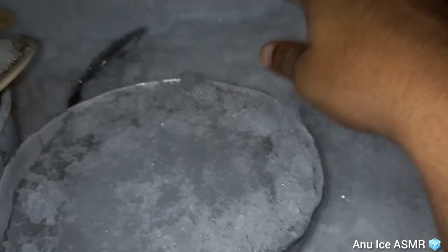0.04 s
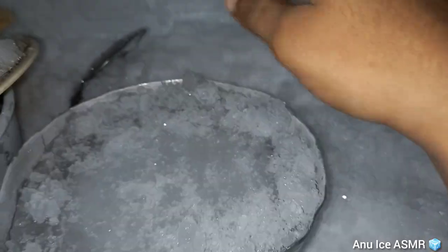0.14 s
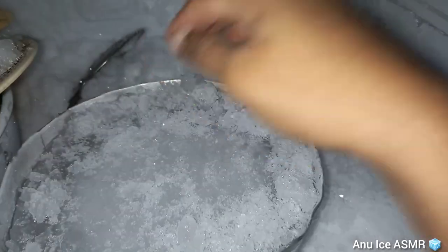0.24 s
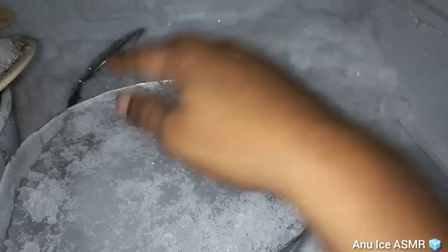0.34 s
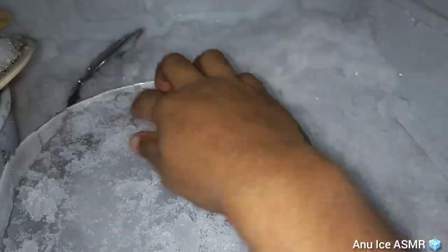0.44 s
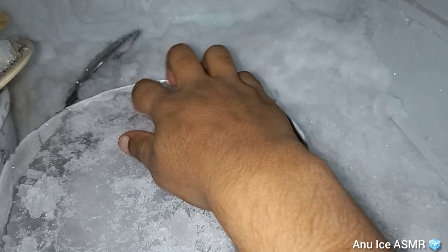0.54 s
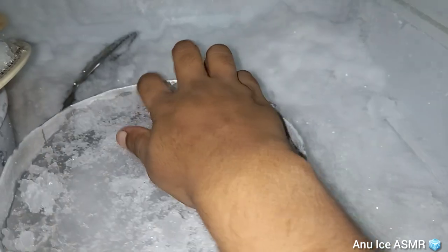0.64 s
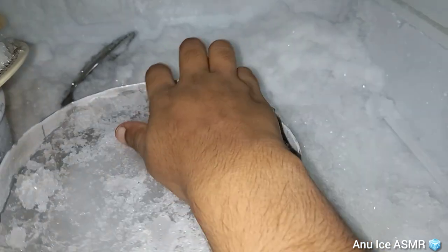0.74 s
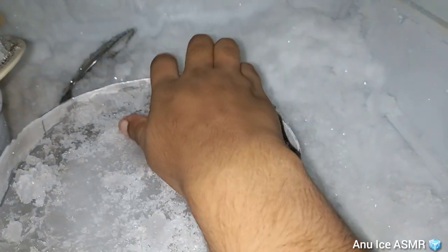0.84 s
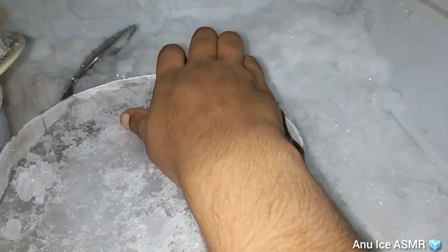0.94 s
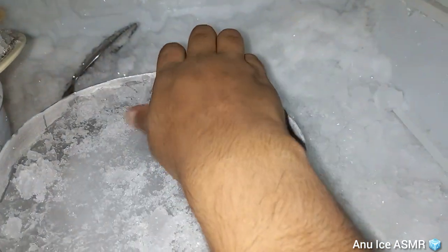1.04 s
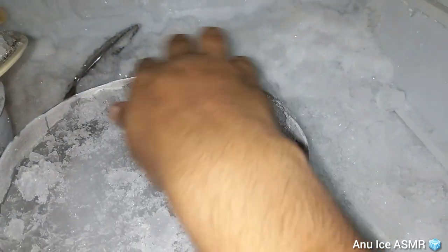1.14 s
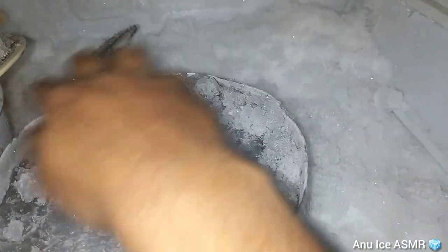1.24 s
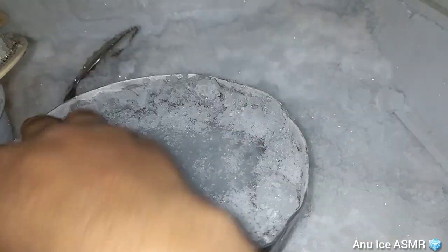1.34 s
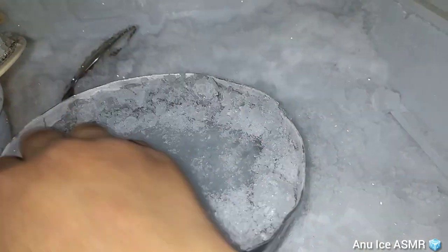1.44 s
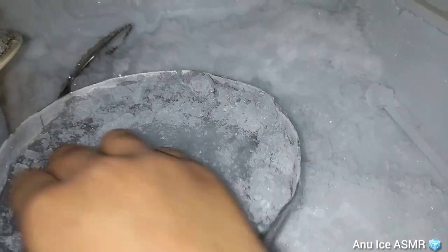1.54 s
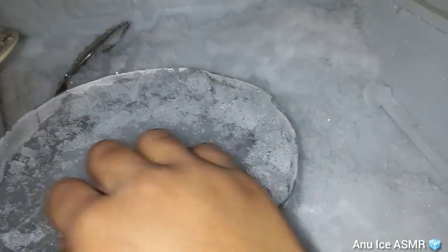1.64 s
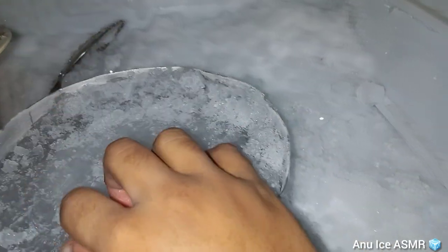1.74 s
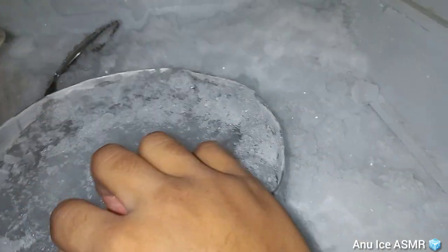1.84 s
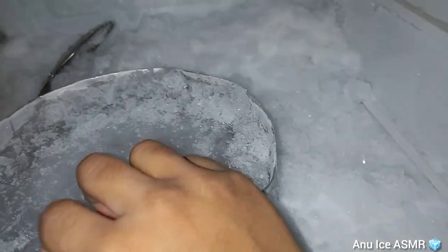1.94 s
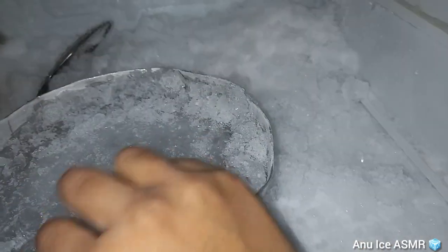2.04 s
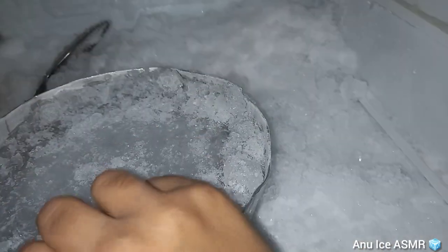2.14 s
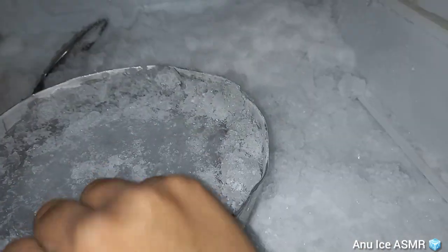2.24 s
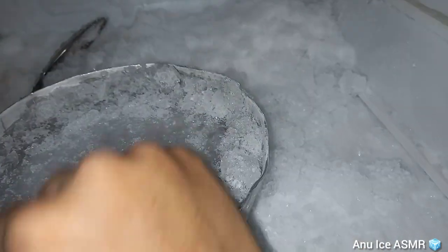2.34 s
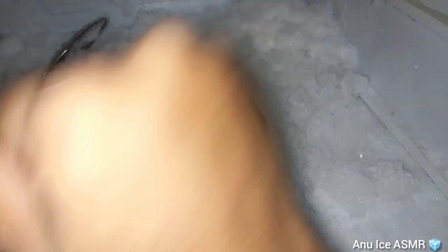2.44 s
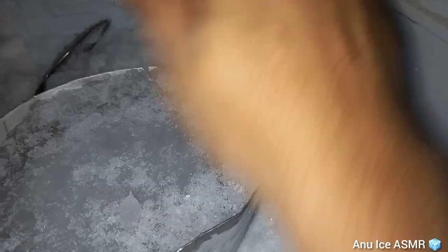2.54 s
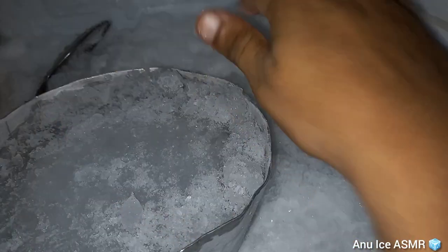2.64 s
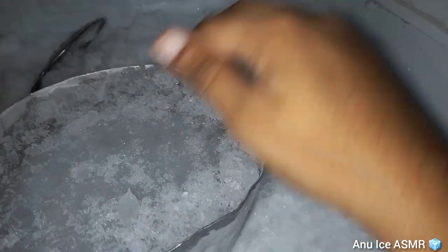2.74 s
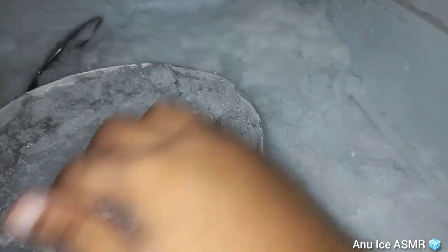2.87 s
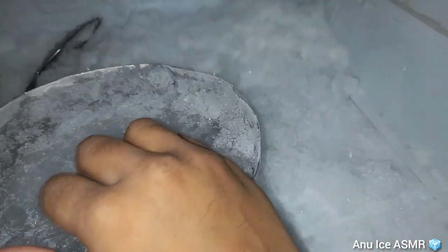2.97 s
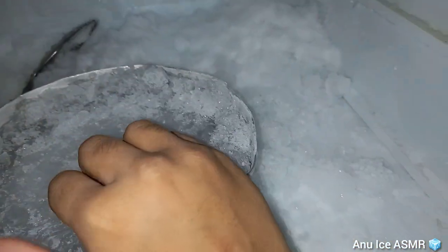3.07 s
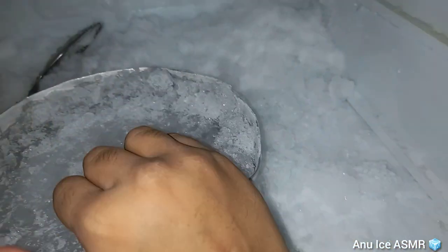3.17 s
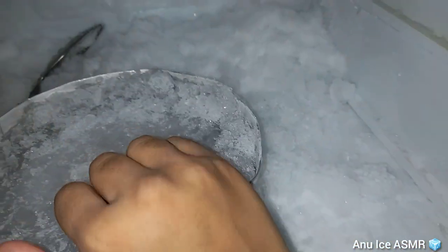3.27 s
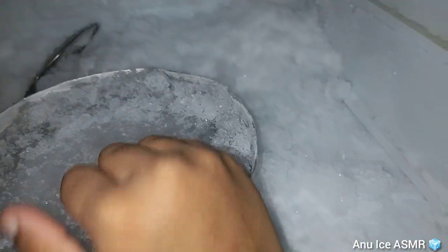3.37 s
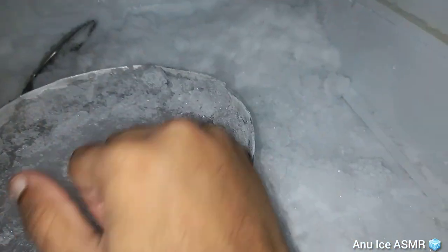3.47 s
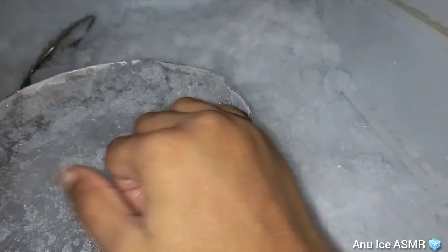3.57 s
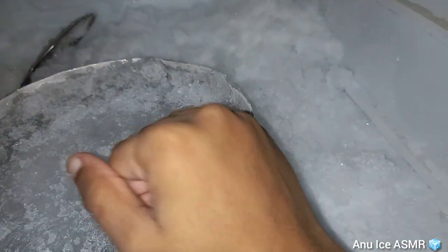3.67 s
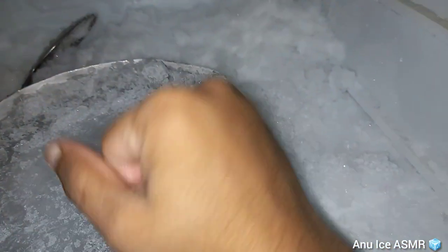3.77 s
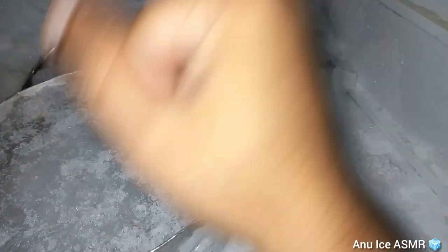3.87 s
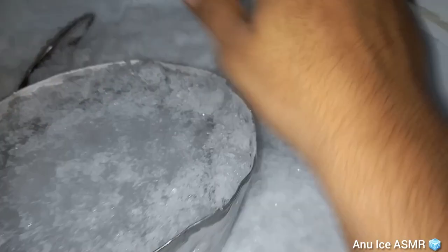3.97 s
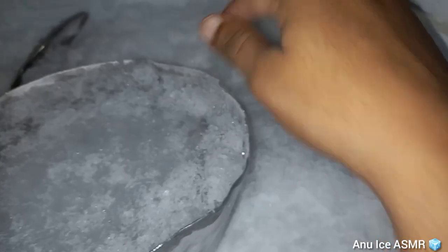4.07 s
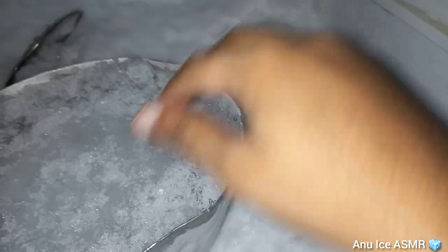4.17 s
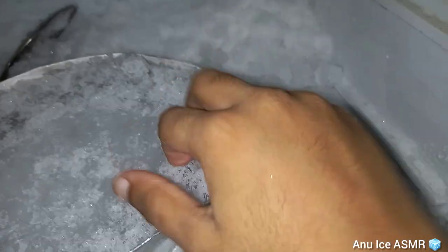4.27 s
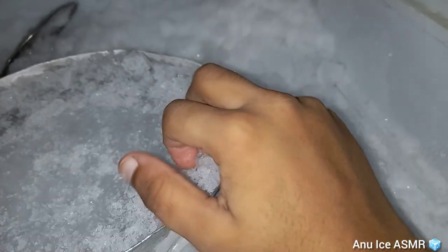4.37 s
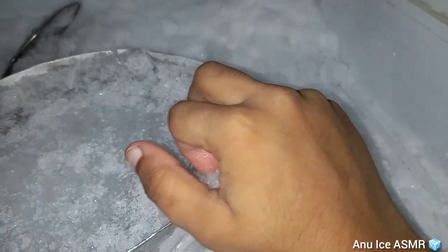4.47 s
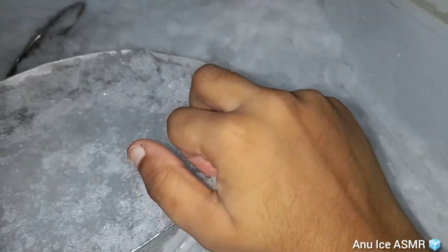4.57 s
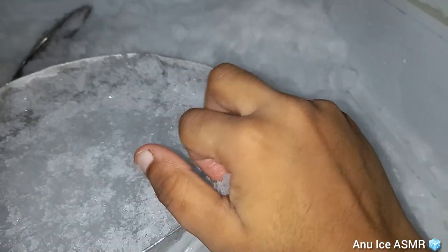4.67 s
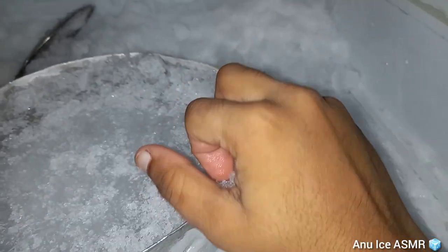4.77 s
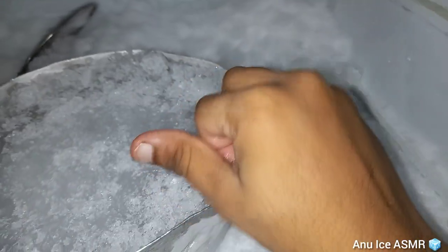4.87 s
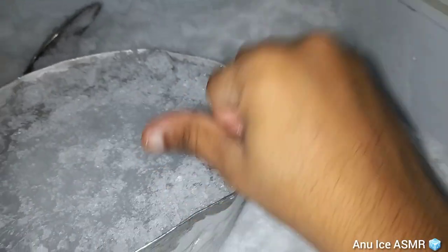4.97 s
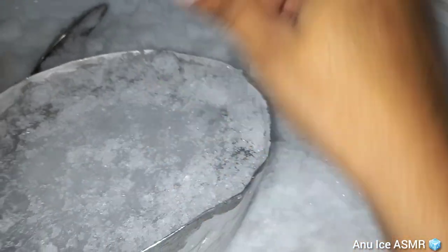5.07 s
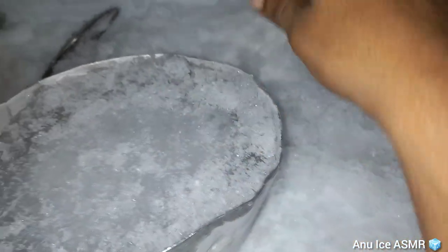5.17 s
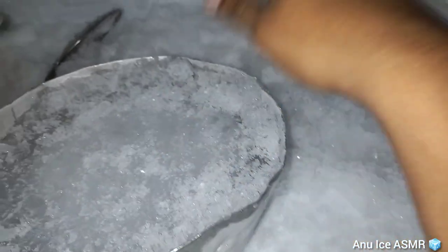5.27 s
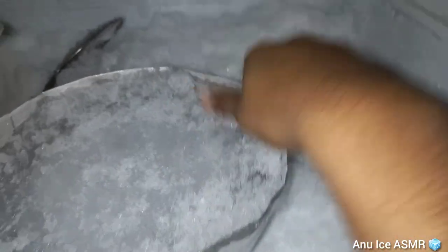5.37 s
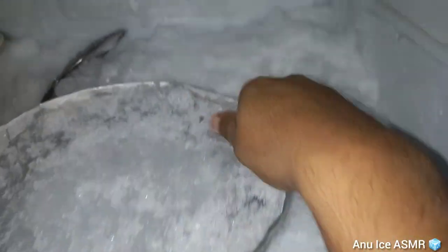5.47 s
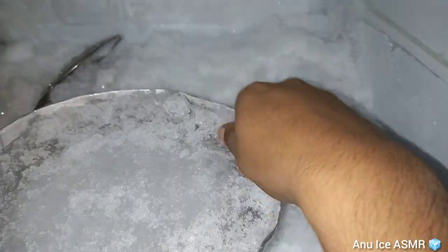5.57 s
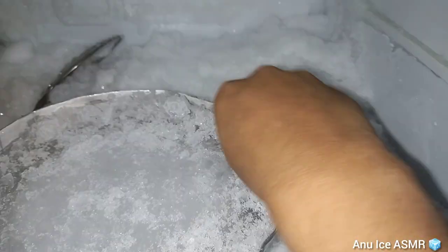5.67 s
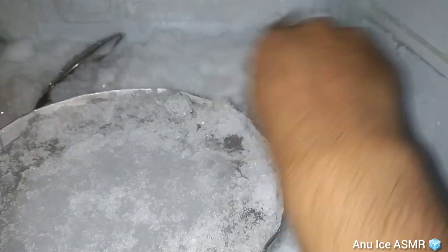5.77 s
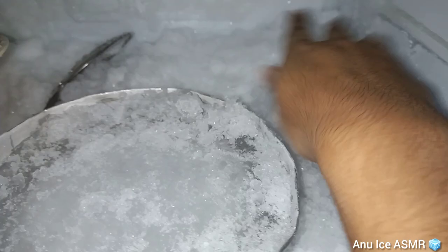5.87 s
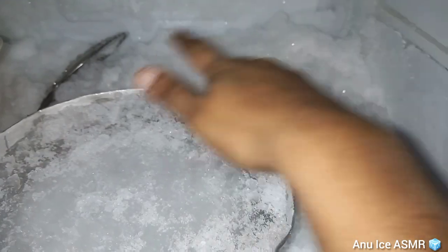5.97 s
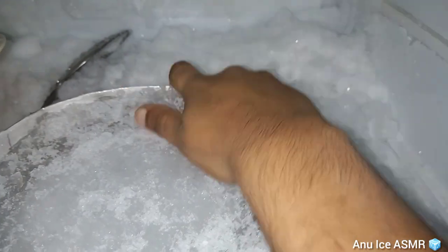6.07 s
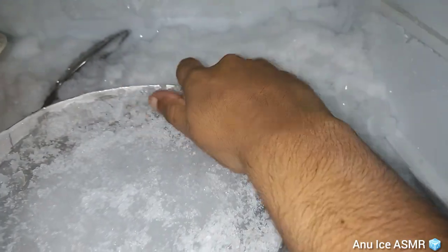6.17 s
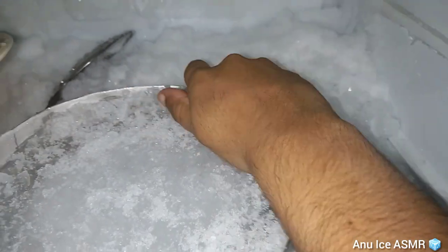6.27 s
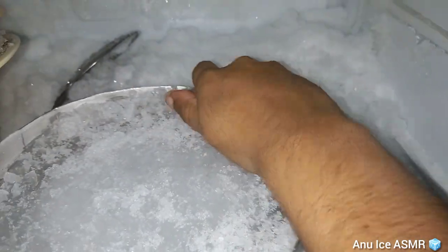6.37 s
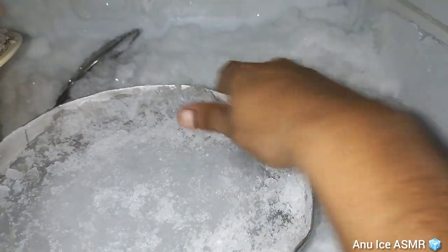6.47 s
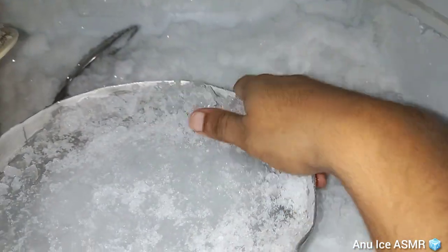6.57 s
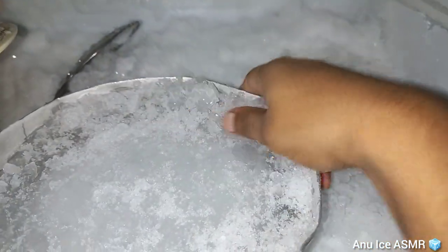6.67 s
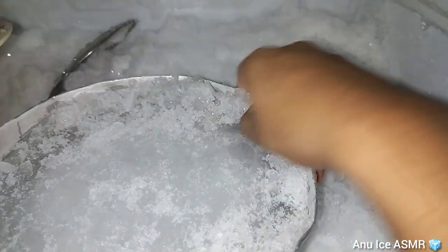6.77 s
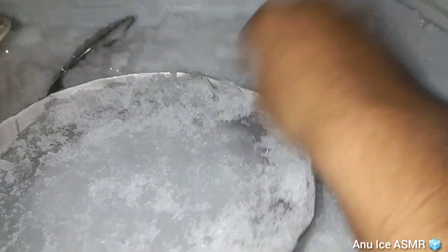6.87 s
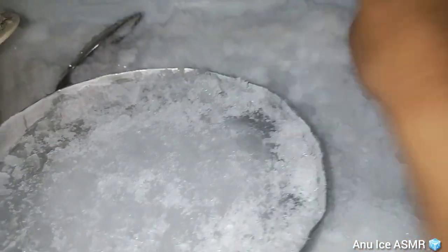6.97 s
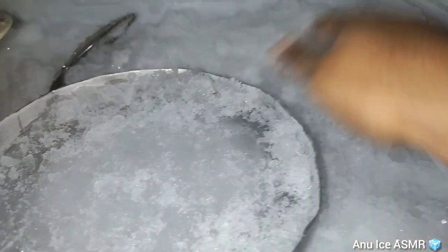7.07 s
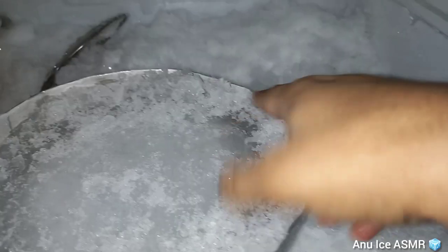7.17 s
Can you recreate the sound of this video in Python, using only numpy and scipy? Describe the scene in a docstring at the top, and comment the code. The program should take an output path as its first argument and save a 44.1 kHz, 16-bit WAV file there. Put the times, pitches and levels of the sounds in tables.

```python
"""A short scrape, a sharp snap of ice and a low boom: frost is pushed around inside a freezer, close up.
The edge sticks and slips over tiny crystals, which hiss, rasp and tick; on hard ice it squeals.
Crusts snap off, packed frost crunches, and shoves make the hollow freezer box boom and shudder.
The compressor hums and rumbles underneath."""
import sys
import numpy as np
from scipy import signal
from scipy.fft import rfft, irfft, next_fast_len
from scipy.io import wavfile
from scipy.ndimage import uniform_filter1d, map_coordinates

SR = 44100
rng = np.random.default_rng(int(sys.argv[2]) if len(sys.argv) > 2 else 0)


def log_audio(samples):
    """Write samples as a 16-bit WAV file to the path given in sys.argv[1]."""
    # one column per channel
    frames = np.atleast_2d(samples).T
    # limit to full scale, then quantise
    limited = np.clip(frames, -1, 1)
    pcm = np.round(limited * 32767).astype(np.int16)
    wavfile.write(sys.argv[1], SR, pcm)


N = 318402

# strokes through frost: (start [s], length [s], hiss [dB], rasp [dB], rasp centre [Hz], swell [dB])
FROST_STROKES = [(0.01, 0.088, -69, -44.5, 3100, 11), (0.101, 0.023, -34.5, -35.5, 5300, -11),
                 (0.116, 0.12, -71, -47, 3200, -7), (0.41, 0.19, -49.5, -58, 3600, -21),
                 (0.551, 0.25, -41, -32, 2800, -5.5), (0.82, 0.11, -52, -57, 3100, -5),
                 (1.062, 0.099, -50, -53, 4500, 14), (1.357, 0.34, -46.5, -49, 3000, 4),
                 (1.719, 0.22, -44, -42.5, 3100, 7.5), (2.0, 0.24, -35.5, -39, 4400, 3.5),
                 (2.238, 0.15, -47.5, -50, 3700, -11.5), (2.687, 0.12, -51.5, -61, 3200, -13),
                 (2.925, 0.099, -49.5, -50.5, 2700, -11), (2.999, 0.09, -45, -39.5, 2880, -7),
                 (3.113, 0.031, -39, -42.5, 3380, 1), (3.326, 0.08, -40, -39, 3270, 8),
                 (3.443, 0.15, -45.5, -47.5, 3500, 2), (3.586, 0.19, -35.5, -38.5, 4350, 4),
                 (4.095, 0.11, -49, -50.5, 2900, -8), (4.233, 0.17, -43.5, -46.5, 4200, -0.5),
                 (4.447, 0.058, -40.5, -40, 4500, 1), (4.693, 0.079, -39.5, -42, 4700, 8),
                 (4.778, 0.094, -45, -47, 4100, 4), (5.283, 0.092, -49, -56.5, 2800, -18.5),
                 (5.407, 0.035, -34.5, -50, 5500, 5), (5.478, 0.024, -31, -43, 5400, 0),
                 (5.543, 0.093, -38.5, -46.5, 5000, 5), (5.66, 0.077, -33, -43, 5600, -7),
                 (5.9, 0.1, -52, -50.5, 3000, 4), (6.057, 0.15, -36, -39.5, 4400, 3),
                 (6.234, 0.32, -47, -47, 4100, -5), (6.387, 0.079, -39.5, -29.5, 2550, 10),
                 (6.482, 0.24, -40.5, -48, 3400, 4.5), (6.743, 0.051, -27.5, -31, 5400, 1.5),
                 (6.854, 0.04, -28, -36.5, 5300, -9), (6.888, 0.17, -54, -54.5, 5600, -2)]
# crusts breaking off: (time [s], level [dB], decay [s], low edge [Hz], ring [Hz])
CRUST_SNAPS = [(0.073, -20, 0.0062, 5300, 7500), (0.0788, -12.5, 0.006, 4900, 7430),
               (0.512, -36, 0.011, 6030, 14000), (0.556, -29.5, 0.0064, 2580, 7700),
               (0.6485, -24, 0.0049, 3500, 7600), (0.799, -22.5, 0.0096, 2860, 12400),
               (0.848, -31.5, 0.0089, 4300, 4570), (0.897, -32, 0.006, 4570, 6800),
               (0.974, -38, 0.0065, 3730, 8350), (1.728, -26.5, 0.01, 3800, 6700),
               (2.014, -33, 0.0032, 4330, 8310), (2.1676, -26, 0.0033, 3070, 7710),
               (2.22, -30, 0.008, 3600, 4500), (2.377, -29, 0.0081, 2400, 2830),
               (2.6837, -26.5, 0.0082, 7000, 13200), (3.114, -24, 0.0043, 2280, 8800),
               (3.237, -29, 0.0059, 1580, 8440), (4.1065, -34, 0.0044, 2090, 15000),
               (4.4537, -16, 0.0073, 3430, 8600), (4.5, -26, 0.0041, 3270, 4100),
               (4.6378, -13.5, 0.0052, 3600, 5260), (4.699, -28, 0.0086, 3720, 8050),
               (4.747, -30.5, 0.015, 3480, 8200), (4.832, -30.5, 0.012, 3150, 3670),
               (5.244, -28, 0.0047, 3740, 11200), (5.538, -30, 0.0065, 4200, 5700),
               (5.639, -29, 0.013, 4170, 4700), (5.679, -28, 0.01, 4930, 7700),
               (5.735, -28, 0.0036, 4900, 7670), (5.922, -30.5, 0.01, 6960, 9300),
               (6.358, -30.5, 0.0038, 4150, 8400), (6.641, -23.5, 0.005, 8300, 15600),
               (6.787, -24, 0.0048, 4400, 12200), (7.2119, -29, 0.004, 2630, 3000)]
# packed frost giving way: (time [s], level [dB], decay [s])
FROST_CRUNCHES = [(0.5871, -10.5, 0.0069), (0.603, -27, 0.012), (0.67, -25, 0.0086), (0.724, -22, 0.013),
                  (0.746, -29, 0.011), (0.807, -27, 0.0085), (1.785, -37.5, 0.028), (1.8308, -26, 0.0063),
                  (1.8596, -18.5, 0.0047), (1.89, -27.5, 0.006), (3.11, -29.5, 0.013), (6.0655, -31, 0.013),
                  (6.384, -33.5, 0.021), (6.415, -25, 0.02), (6.442, -23, 0.0067), (6.46, -22, 0.0041),
                  (6.743, -27, 0.0094), (6.858, -29, 0.007)]
# glides over hard ice: (centre [s], level [dB], pitch [Hz], bandwidth [Hz], half length [s])
ICE_SQUEALS = [(1.63, -49.5, 3680, 700, .13), (2.377, -32.5, 3000, 600, .016), (3.696, -40, 3040, 750, .12),
               (4.263, -41, 4330, 550, 0.026), (4.846, -33.5, 4140, 1500, .03),
               (5.438, -36.5, 5700, 900, .018), (5.5, -30, 5500, 1200, 0.027),
               (5.551, -35, 5570, 900, 0.033), (5.59, -29, 5130, 900, 0.012),
               (5.698, -33, 7400, 900, 0.033), (6.789, -34, 5700, 1100, 0.018),
               (6.95, -50.5, 5820, 400, .06)]
# shoves on the box: (centre [s], level [dB], pitch [Hz], nominal length [s])
BOX_SHOVES = [(0.101, -29, 124, 0.027), (0.43, -33, 134, 0.022), (0.618, -13.5, 130.3, 0.038),
              (0.757, -22, 137.2, 0.013), (0.842, -19, 126, 0.053), (1.376, -23, 125.7, 0.024),
              (1.501, -18, 126.9, 0.018), (1.556, -17.5, 137.6, 0.021), (1.705, -20, 126.2, 0.02),
              (1.833, -20, 121.4, 0.027), (2.185, -15.5, 128.3, 0.035), (2.945, -14, 126, 0.022),
              (3.014, -17, 131.8, 0.019), (3.263, -24, 120, 0.024), (3.869, -20.5, 108.5, 0.016),
              (4.357, -18.5, 124, 0.03), (6.093, -17.5, 124.6, 0.02), (6.197, -23, 121, 0.034),
              (6.46, -15.5, 133.8, 0.047), (6.776, -22, 121.6, 0.022)]
# long pushes: (start [s], length [s], level [dB], pitch [Hz])
BOX_DRAGS = [(0.63, 0.38, -33.5, 126.3), (1.412, 0.57, -30, 128), (2.013, 0.27, -26.5, 122.4),
             (2.294, 0.18, -34, 128), (3.03, 0.039, -26, 129.5), (3.115, 0.058, -25.5, 133),
             (3.309, 0.1, -27, 115), (3.599, 0.072, -32, 114), (3.749, 0.093, -27, 118),
             (3.858, 0.13, -26, 101.8), (4.28, 0.12, -24, 117.8), (4.414, 0.15, -30.5, 116),
             (4.649, 0.18, -31, 116), (5.482, 0.23, -27.5, 127), (6.477, 0.47, -31, 130.2)]
# ice spectra: (frequency [Hz], level [dB])
HISS_SPECTRUM = [(2500, -15), (5000, -2.5), (6800, -4), (8300, 3), (10000, -4), (12500, -0.5),
                 (16000, -5.5)]
RASP_SPECTRUM = [(400, 8), (1200, 10), (2500, 7), (4500, 4), (6500, -4.5), (9000, 0.5), (16000, -10)]
TICK_SPECTRUM = [(1000, -36), (4000, -2), (9000, -14.5), (16000, -44)]
SNAP_SPECTRUM = [(500, 16.5), (2000, 4.5), (4500, -3), (8500, -1.5), (11000, -4.5), (16000, -5.5)]
CRUNCH_SPECTRUM = [(60, -40), (150, -16), (260, -1.5), (480, 10), (750, -10.5), (1350, -1), (1900, -3.5),
                   (3100, -7.5), (4500, -5), (8000, -16.5), (16000, -26.5)]
# tray and box resonances: (centre [Hz], bandwidth [Hz], gain [dB])
TRAY_MODES = [(895, 96, 13.5), (1261, 59, 12), (1406, 42, 11), (1527, 74, 8.5), (2200, 81, 6.5),
              (2550, 190, 14.5)]
BOX_MODES = [(97.6, 14.8, 3), (136.5, 24.8, 3), (183.4, 49, -7.5), (251.5, 24, -6.5), (313.6, 63.5, -12),
             (396, 64, -15.5), (477, 38, -11.5)]
# compressor lines and noise spectra: (frequency [Hz], level [dB])
HUM_LINES = [(47, -60), (124, -44), (256, -58), (466, -61)]
RUMBLE_SPECTRUM = [(25, -52), (45, -12), (69, -19.5), (83, -9), (108, -0.5), (143, -28), (190, -35),
                   (245, -18.5), (440, -11), (556, -15.5), (659, -24.5), (1000, -19), (1400, -71)]
AIR_SPECTRUM = [(350, -53.5), (600, -21.5), (634, -0.5), (779, -6.5), (1050, -8), (1390, -6.5), (1850, -11),
                (2010, -12), (2870, -17.5), (4400, -35.5), (8270, -23), (16000, -44)]
# left-right likeness of diffuse noise: (frequency [Hz], coherence [0..1])
STEREO_COHERENCE = [(30, 0.63), (70, 0.93), (160, 1), (300, 0.66), (600, 0.4), (2000, 0.1), (8000, 0.25)]
# balance of the ice: (frequency [Hz], right over left [dB])
ICE_BALANCE = [(1000, -0.5), (4000, 3.5), (6000, 0), (8500, 7.5), (12000, 4), (16000, -1.5)]

TOP_HZ, REST_RASP_HZ = 15900, 2450


def scraping(hiss_gain, rasp_gain, centre_hz, hiss_db=-1, rasp_db=-3.5, focus_db=6, focus_oct=0.099):
    """The edge grinds over crystals: fine hiss plus a coarse rasp that thins as its pitch climbs."""
    fractures = np.array([grains(N, spread_db=-0.5), grains(N, spread_db=6)])
    hz, t, (fine, coarse) = signal.stft(fractures, SR, nperseg=256)
    hz = hz[:, None]
    pitch_hz = np.interp(t, np.arange(N) / SR, centre_hz)
    bump_db = focus_db * np.exp(-(np.log2((hz + 1) / pitch_hz) / focus_oct) ** 2)
    cutoff_hz = 450 * (pitch_hz / REST_RASP_HZ) ** 2.7
    highpass_db = -10 * np.log10(1 + (cutoff_hz / (hz + 1)) ** 2)
    # each patch of frost has its own colour
    patches = uniform_filter1d(rng.standard_normal(fine.shape[-2:]), size=3, axis=0)
    patch_db = 2.5 * unit(uniform_filter1d(patches, size=14, axis=1))

    def coloured(cells, colour_db):
        colour = amp(colour_db + patch_db)
        _, sound = signal.istft(cells * colour / np.linalg.norm(colour, axis=0), SR, nperseg=256)
        return unit(sound[:, :N])

    hiss = coloured(fine, along(HISS_SPECTRUM, hz))
    rasp = coloured(coarse, along(RASP_SPECTRUM, hz) + bump_db + highpass_db)
    return stick_slip() * (hiss_gain * amp(hiss_db) * hiss + rasp_gain * amp(rasp_db) * rasp)


def strokes(attack_s=0.024, release_s=0.015, trickle_db=-23.5, trickle_s=0.04):
    """The edge bites, then lets go; loose crystals trickle on. Returns hiss gain, rasp gain, rasp Hz."""
    t = np.arange(N) / SR
    hiss_power, rasp_power = np.full(N, amp(-61) ** 2), np.full(N, amp(-58) ** 2)  # rustle at rest
    weighted_hz = rasp_power * REST_RASP_HZ
    for start_s, length_s, hiss_db, rasp_db, hz, swell_db in FROST_STROKES:
        span = slice(max(int((start_s - attack_s) * SR), 0), int((start_s + length_s + 0.5) * SR))
        age_s = t[span] - start_s
        after_s = np.maximum(age_s - length_s, 0)
        bite = np.clip(age_s / attack_s + 0.5, 0, 1)
        swell = amp(swell_db * (np.clip(age_s / length_s, 0, 1) - 0.5))
        release = np.maximum(np.exp(-after_s / release_s), amp(trickle_db) * np.exp(-after_s / trickle_s))
        power = (bite * swell * release) ** 2
        hiss_power[span] += amp(hiss_db) ** 2 * power
        rasp_power[span] += amp(rasp_db) ** 2 * power
        weighted_hz[span] += amp(rasp_db) ** 2 * power * hz
    resistance = amp(2.5 * wobble(rate_hz=28))
    return resistance * np.sqrt(hiss_power), resistance * np.sqrt(rasp_power), weighted_hz / rasp_power


def stick_slip(rate_hz=200, spread_db=5, decay_s=0.0078, glide=0.45):
    """Gain of an edge that gives way in sudden, decaying jerks over a steady glide."""
    slips = rng.random(N) < rate_hz / SR
    jerks = slips * amp(spread_db * np.clip(rng.standard_normal(N), -2, 1.5))
    power = signal.lfilter([1], [1, -np.exp(-2 / (decay_s * SR))], jerks ** 2)
    return unit(np.sqrt(power / np.mean(power) + glide ** 2))


def snaps(level_db=5, ring_db=12, overtone_db=8, width_hz=330, body_db=-26):
    """Each crust cracks above a pitch set by its size, and rings briefly in its own modes."""
    track = np.zeros((2, N))
    for time_s, db, decay_s, low_hz, ring_hz in CRUST_SNAPS:
        overtones_hz = low_hz * (TOP_HZ / low_hz) ** rng.random((6, 1))

        def colour(hz):
            highpass = amp(body_db) + 1 / np.sqrt(1 + (low_hz / (hz + 1)) ** 12)
            overtones = peak(hz, overtones_hz, width_hz).max(axis=0)
            modes_db = np.maximum(ring_db * peak(hz, ring_hz, width_hz), overtone_db * overtones)
            return highpass * amp(along(SNAP_SPECTRUM, hz) + modes_db)

        crack = fracture(decay_s, colour, spread_db=-3.5, rise_s=decay_s / 4, crumb_db=-27, crumb_s=0.0098)
        add(track, time_s, amp(db + level_db) * crack)
    return track


def crunches(level_db=1):
    """Packed frost collapses with a duller crack that rings the tray."""
    def colour(hz):
        tray_db = sum(db * peak(hz, centre_hz, width_hz) for centre_hz, width_hz, db in TRAY_MODES)
        return amp(along(CRUNCH_SPECTRUM, hz) + tray_db)

    track = np.zeros((2, N))
    for time_s, db, decay_s in FROST_CRUNCHES:
        crack = fracture(decay_s, colour, spread_db=4, rise_s=0.0013, crumb_db=-16.5, crumb_s=0.019)
        add(track, time_s, amp(db + level_db) * crack)
    return track


def fracture(decay_s, colour, spread_db, rise_s, crumb_db, crumb_s):
    """A burst of micro-cracks starts sharply and trails off in crumbs."""
    t = np.arange(SR // 8) / SR
    decay = np.exp(-t / decay_s) + amp(crumb_db) * np.exp(-t / crumb_s)
    envelope = (1 - np.exp(-t / rise_s)) * decay
    burst = envelope * filtered(grains(len(t), spread_db), colour)
    return np.sqrt(2) * burst * np.linalg.norm(envelope) / np.linalg.norm(burst)


def grains(count, spread_db, shared=0.29):
    """Dense micro-fractures of scattered size; close walls make left and right mostly unlike."""
    noise = np.clip(rng.standard_normal((2, count)) + shared * rng.standard_normal(count), -2, 2)
    sizes = amp(spread_db * np.clip(rng.standard_normal(count), -2, 1))
    return unit(noise * sizes)


def crackle(force, level_db=6, rate_hz=100, spread_db=1.5, decay_s=0.00064):
    """Single crystals break ahead of the edge with dry ticks, bigger under a harder stroke."""
    track, t = np.zeros((2, N)), np.arange(SR // 200) / SR
    for position, chance in rng.uniform(0.001, 0.999, (int(rate_hz * N / SR), 2)):
        tick = rng.standard_normal((2, len(t))) * np.exp(-t / decay_s)
        size_db = spread_db * min(-np.log(chance), np.pi)
        add(track, position * N / SR, force[int(position * N)] * amp(level_db + size_db) * tick)
    return filtered(track, lambda hz: amp(along(TICK_SPECTRUM, hz)))


def squeals():
    """Friction on hard ice feeds one narrow resonance, which swells and fades."""
    track = np.zeros((2, N))
    for centre_s, db, pitch_hz, width_hz, half_s in ICE_SQUEALS:
        swell = signal.windows.hann(int(2 * half_s * SR))
        ring = filtered(grains(len(swell), spread_db=13), lambda hz: peak(hz, pitch_hz, width_hz))
        add(track, centre_s - half_s, amp(db) * swell * unit(ring))
    return track


def booms(level_db=2, octave_db=-21, sag=0.0168):
    """A shove swells the box's low resonance; pitch sags as pressure eases. Returns sound, force."""
    track, force = np.zeros(N), np.zeros(N)
    t = np.arange(-SR // 10, SR // 10) / SR
    for centre_s, db, hz, length_s in BOX_SHOVES:
        offsets_rad = rng.uniform(0, 2 * np.pi, 2)
        progress = t / (0.66 * max(length_s, 0.015))
        swell = amp(db + level_db) * np.exp(-progress ** 2)
        phase = 2 * np.pi * np.cumsum(hz * (1 - sag * np.tanh(progress))) / SR
        tone = np.sin(phase + offsets_rad[0]) + amp(octave_db) * np.sin(2 * phase + offsets_rad[1])
        add(track, centre_s + t[0], swell * tone)
        add(force, centre_s + t[0], swell)
    return track, force


def shudder(level_db=-1, attack_s=0.024, release_s=0.01, uneven_db=4.5, uneven_hz=30):
    """A long push sticks and slips, swinging the box's low resonance unevenly. Returns sound, force."""
    swing, force = np.zeros(N, complex), np.zeros(N)
    for start_s, length_s, db, hz in BOX_DRAGS:
        t = np.arange(-attack_s / 2, length_s + 10 * release_s, 1 / SR)
        rise = np.clip(t / attack_s + 0.5, 0, 1)
        push = amp(db + level_db) * rise * np.exp(-np.maximum(t - length_s, 0) / release_s)
        add(swing, start_s + t[0], push * np.exp(2j * np.pi * hz * t))
        add(force, start_s + t[0], push)
    uneven = np.sqrt(2) * unit(amp(uneven_db * np.tanh(wobble(uneven_hz))))
    drift_rad = wobble(uneven_hz)
    return uneven * np.imag(swing * np.exp(1j * drift_rad)), uneven * force


def thud(force, level_db=-15, low_hz=205, high_hz=310):
    """Pressure on the frost sounds the box's middle resonances as dull noise."""
    band = lambda hz: hz ** 4 / (hz ** 4 + low_hz ** 4) / (1 + (hz / high_hz) ** 4)
    return amp(level_db) * force * stereo_noise(lambda hz: box(hz) * band(hz))


def rubbing(rasp_gain, level_db=-40, follow=0.46, low_hz=150):
    """Friction shakes the box, more under a harder stroke."""
    rasp_db = 20 * np.log10(rasp_gain)
    gain = amp(level_db + follow * (rasp_db - np.mean(rasp_db)))
    return gain * stereo_noise(lambda hz: box(hz) * hz / np.hypot(hz, low_hz))


def box(hz):
    """Response of the hollow box: resonances of alternating sign."""
    return sum((-1) ** k * amp(db) * 1j * hz * width_hz / (mode_hz ** 2 - hz ** 2 + 1j * hz * width_hz)
               for k, (mode_hz, width_hz, db) in enumerate(BOX_MODES))


def hollow_ring(level_db=-37, hz=472, t60_s=0.64):
    """A faint hollow note, as of the touched tray, dies away at the start."""
    t = np.arange(N) / SR
    return amp(level_db - 60 * t / t60_s) * np.sin(2 * np.pi * hz * t)


def walls(ice, tail_db=-22, t60_s=0.7):
    """Frosted walls add a faint short tail; the right microphone faces the ice."""
    t = np.arange(SR // 4) / SR
    echoes = rng.standard_normal((2, len(t))) * amp(-60 * t / t60_s)
    tail = signal.fftconvolve(ice, echoes / np.linalg.norm(echoes[0]), axes=1)[:, :N]
    balance = lambda hz: amp(np.outer([-0.5, 0.5], along(ICE_BALANCE, hz)))
    return filtered(ice + amp(tail_db) * tail, balance)


def compressor(rumble_db=-44, air_db=-50, waver_db=3, drift_rad=0.58):
    """Wavering hum lines over a rumble and a soft airy hiss."""
    hum, t = np.zeros(N), np.arange(N) / SR
    for hz, db in HUM_LINES:
        gain = np.sqrt(2) * amp(db + waver_db * wobble(rate_hz=4.5))
        hum += gain * np.sin(2 * np.pi * hz * t + drift_rad * wobble(rate_hz=10))
    rumble = stereo_noise(lambda hz: amp(along(RUMBLE_SPECTRUM, hz)))
    air = stereo_noise(lambda hz: amp(along(AIR_SPECTRUM, hz)))
    return hum + amp(rumble_db) * rumble + amp(air_db) * air


def stereo_noise(response):
    """Diffuse noise of rms 1, nearly mono in the bass."""
    def mid_side(hz):
        angle = np.arccos(along(STEREO_COHERENCE, hz)) / 2
        return response(hz) * np.array([np.cos(angle), np.sin(angle)])

    mid, side = filtered(rng.standard_normal((2, N)), mid_side)
    return unit(np.array([mid + side, mid - side]))


def amp(db):
    """Decibels to gain."""
    return 10 ** (np.asarray(db) / 20)


def unit(x):
    """Scale to rms 1."""
    return x / np.sqrt(np.mean(x ** 2) + 1e-20)


def along(points, hz):
    """Interpolate (Hz, value) points on a log axis."""
    knots_hz, values = np.transpose(points)
    return np.interp(np.log(hz + 1), np.log(knots_hz + 1), values)


def peak(hz, centre_hz, width_hz):
    """Resonance bell, 1 at its centre."""
    return 1 / (1 + (2 * (hz - centre_hz) / width_hz) ** 2)


def wobble(rate_hz):
    """Smooth curve through random knots."""
    knots = rng.standard_normal(int(N * rate_hz / SR) + 4)
    return map_coordinates(knots, [np.arange(N) * rate_hz / SR])


def filtered(x, response):
    """Apply a frequency response."""
    n = x.shape[-1]
    padded = next_fast_len(n + n // 2)
    return irfft(rfft(x, padded) * response(np.fft.rfftfreq(padded, 1 / SR)), padded)[..., :n]


def add(track, time_s, sound):
    """Mix a sound into a track."""
    start = int(np.clip(round(time_s * SR), 0, N - 1))
    track[..., start:start + sound.shape[-1]] += sound[..., :N - start]


def scene(shove_share=0.45):
    """Ice between the walls, the booming box, the compressor."""
    hiss_gain, rasp_gain, centre_hz = strokes()
    ice = scraping(hiss_gain, rasp_gain, centre_hz) + crackle(hiss_gain) + squeals() + snaps() + crunches()
    boom, shove = booms()
    groan, push = shudder()
    enclosed_ice = walls(ice)
    body = boom + groan + thud(shove_share * shove + push) + hollow_ring() + rubbing(rasp_gain)
    return enclosed_ice + body + compressor()


def record(dry):
    """Brick-wall low-pass."""
    return filtered(dry, lambda hz: hz < TOP_HZ)


dry = scene()
out = record(dry)
log_audio(out)
```